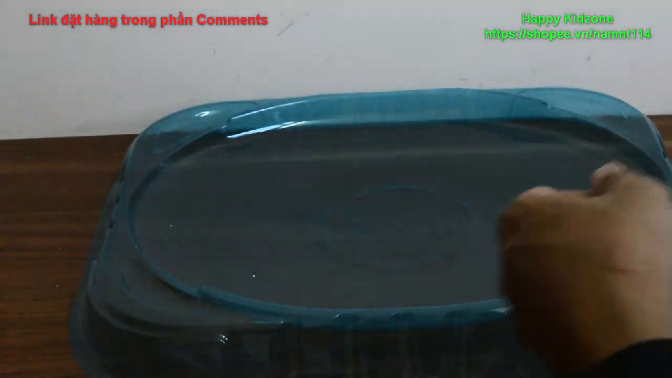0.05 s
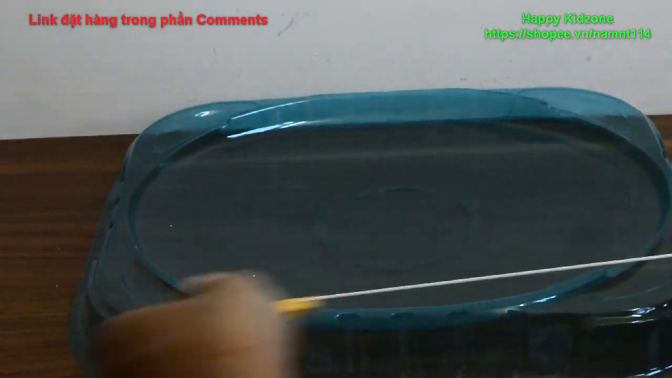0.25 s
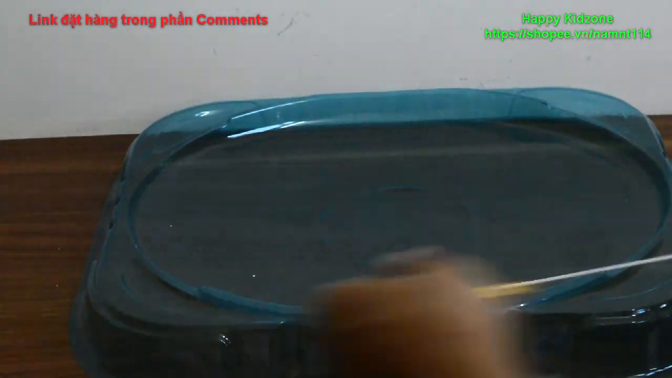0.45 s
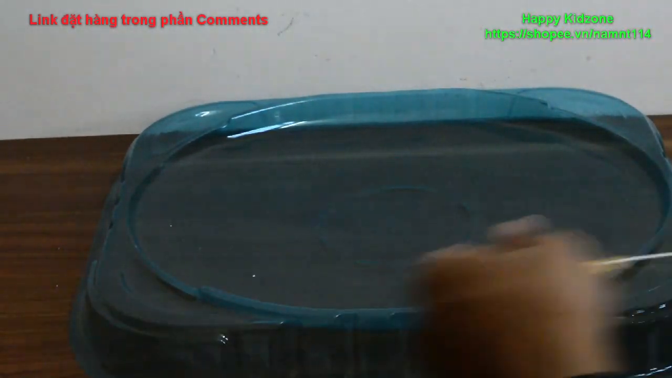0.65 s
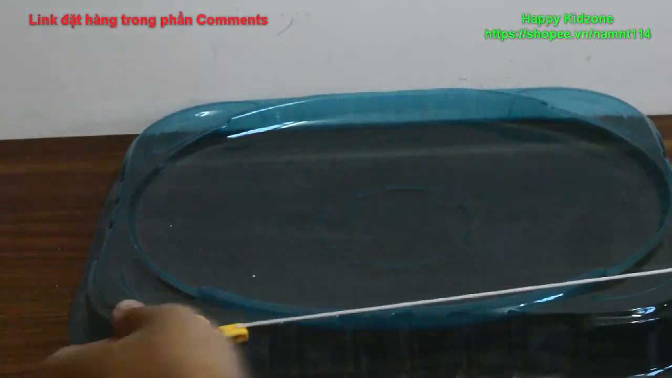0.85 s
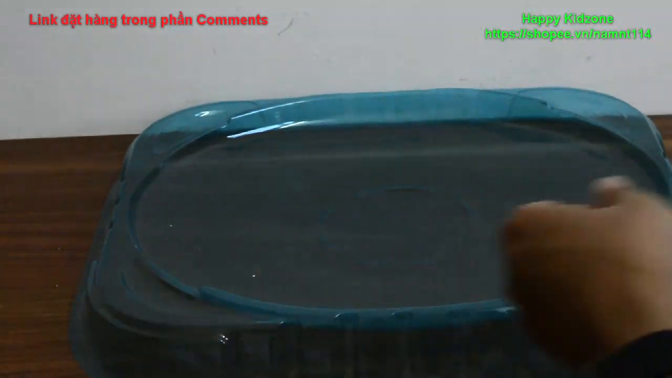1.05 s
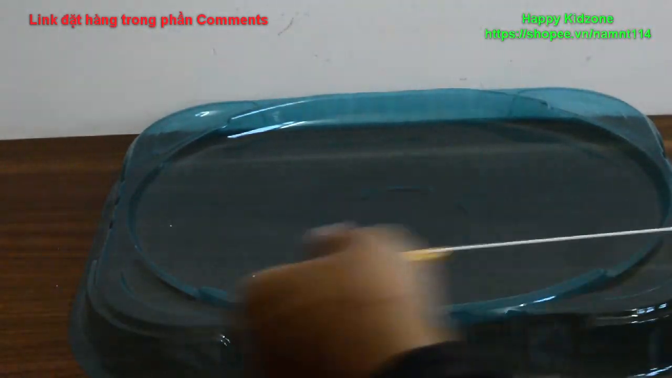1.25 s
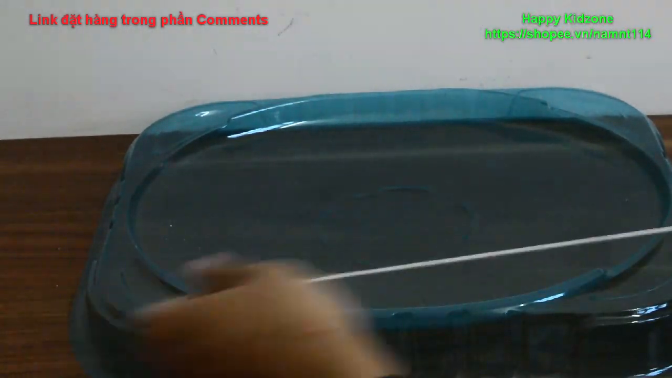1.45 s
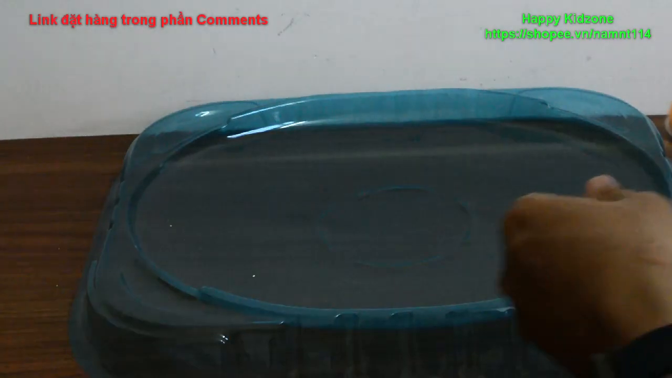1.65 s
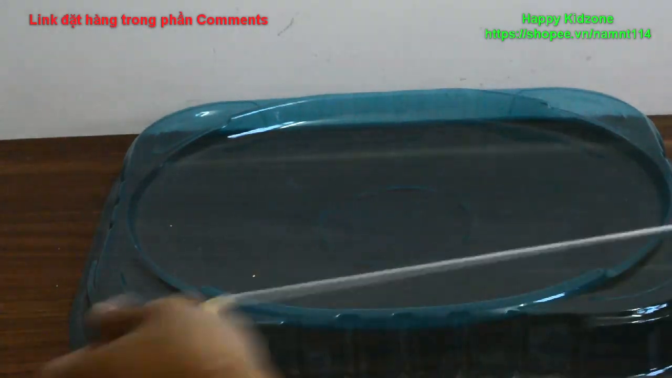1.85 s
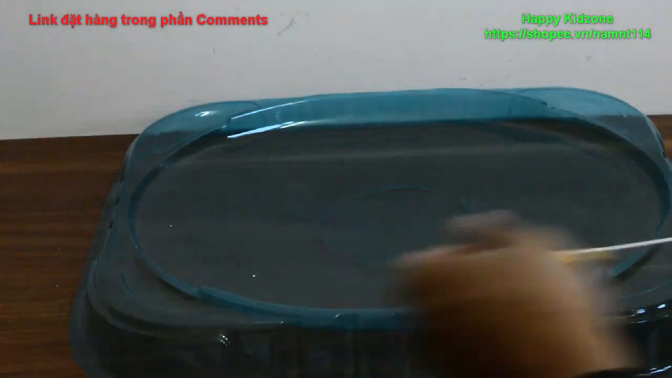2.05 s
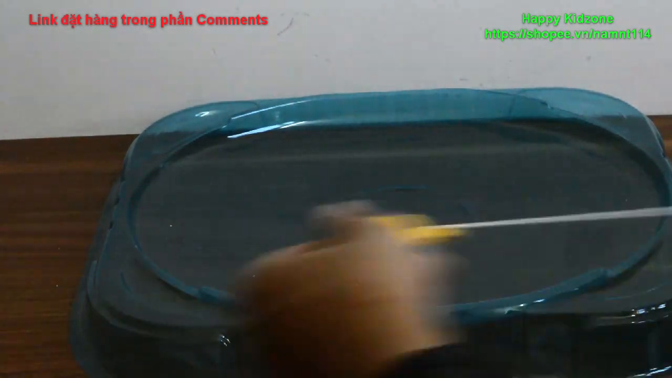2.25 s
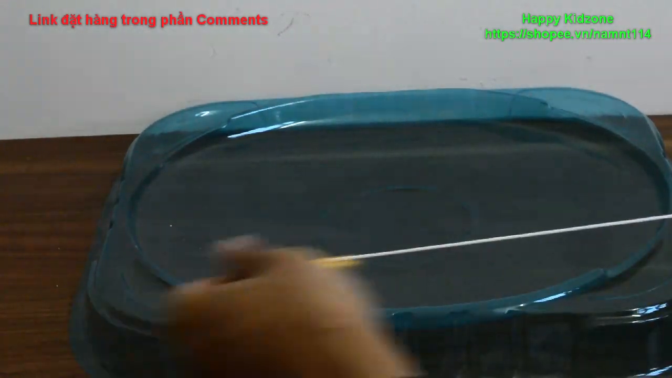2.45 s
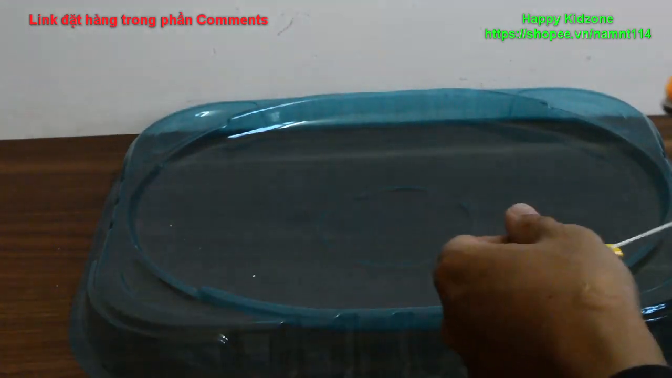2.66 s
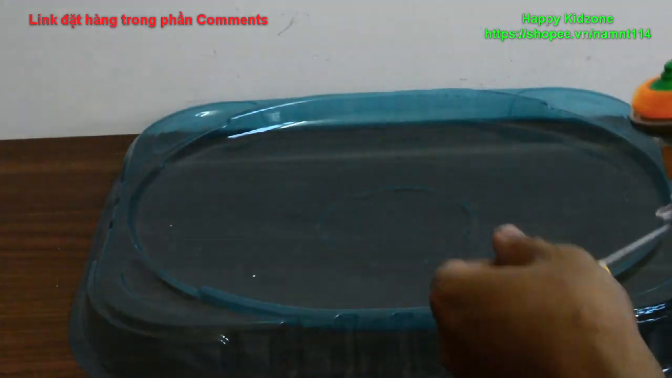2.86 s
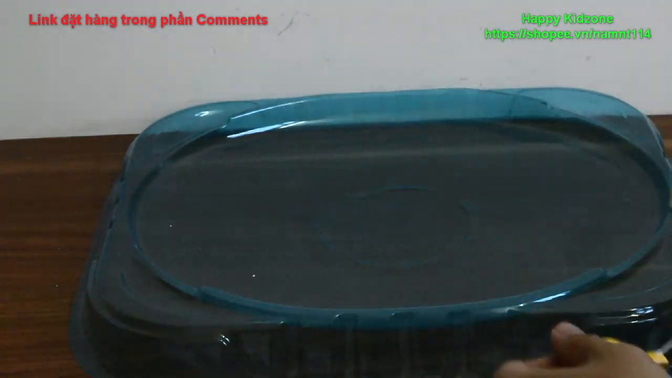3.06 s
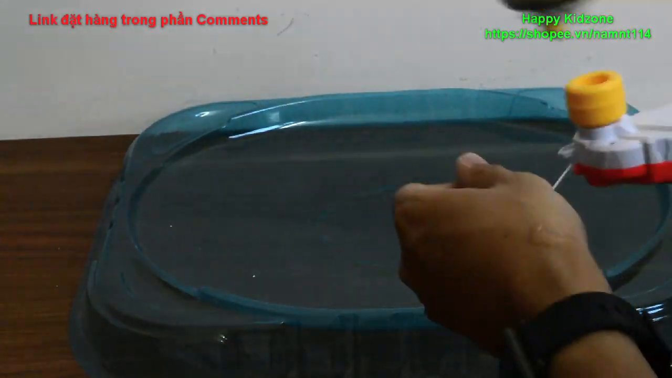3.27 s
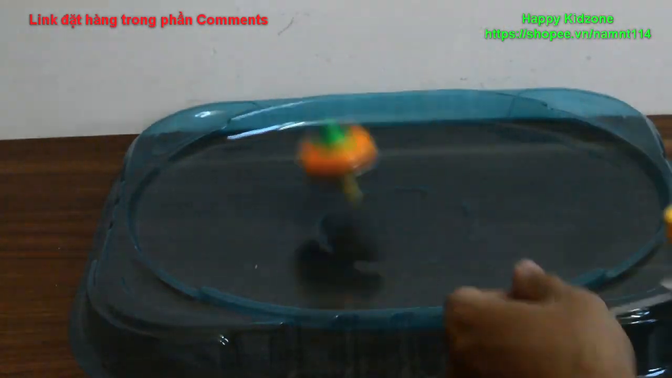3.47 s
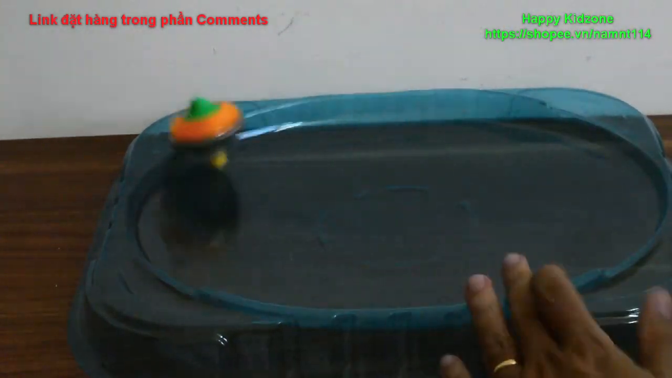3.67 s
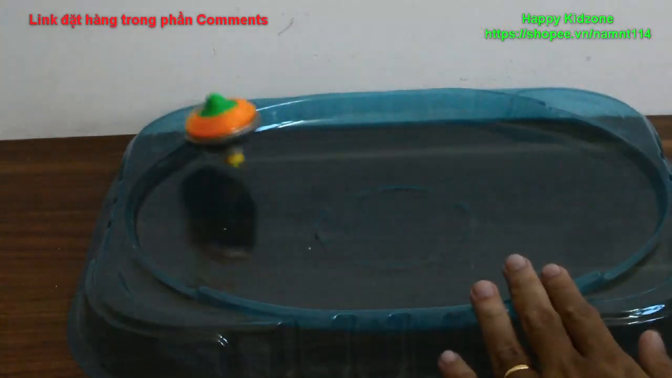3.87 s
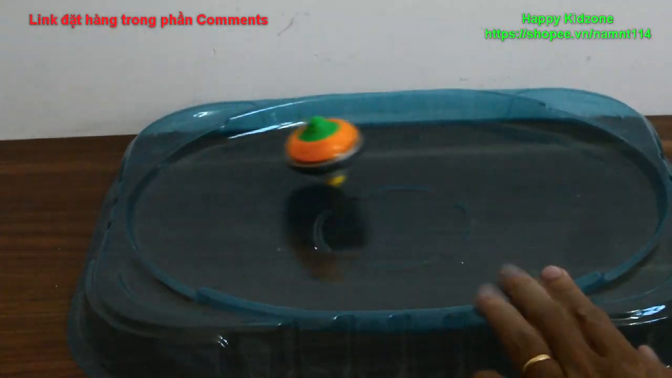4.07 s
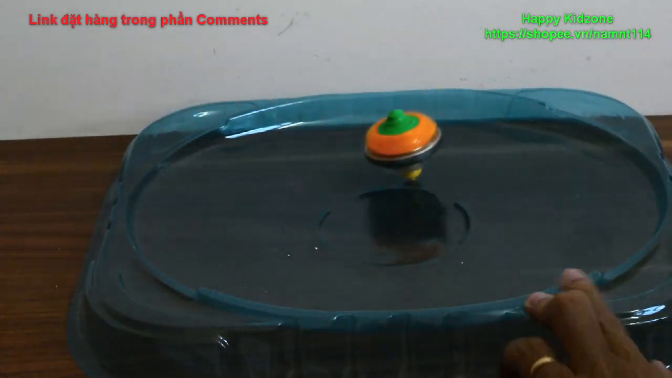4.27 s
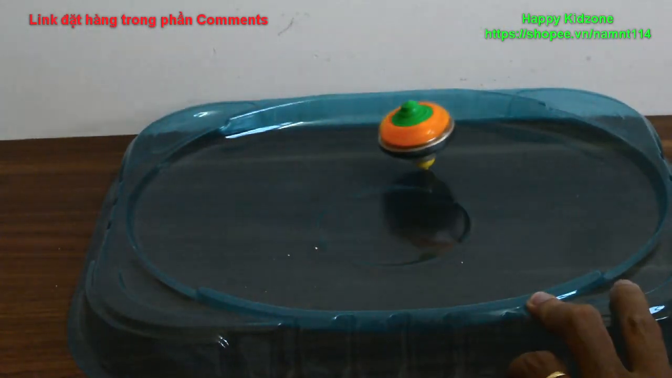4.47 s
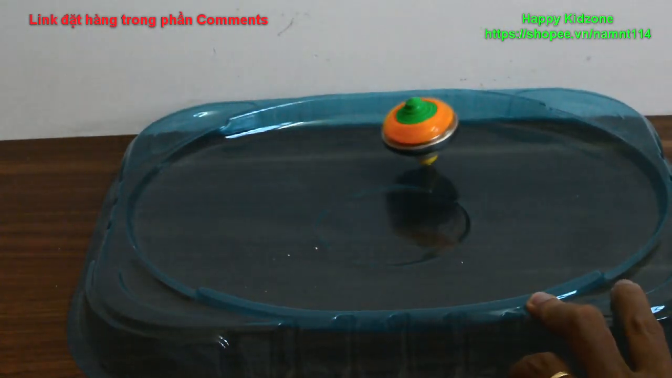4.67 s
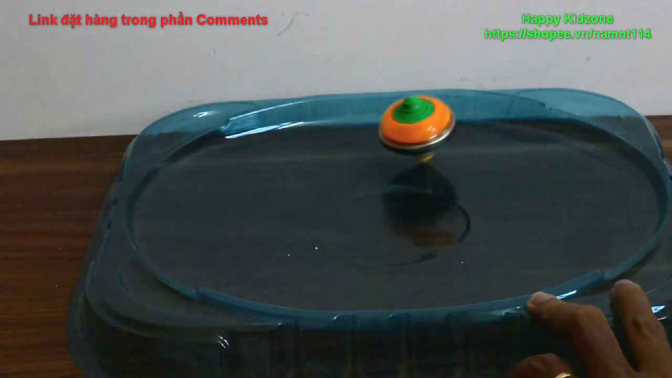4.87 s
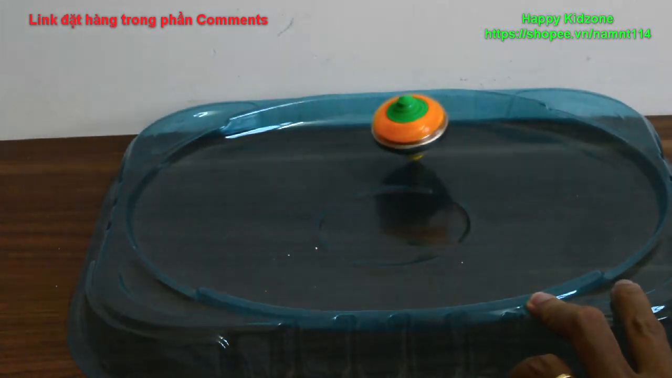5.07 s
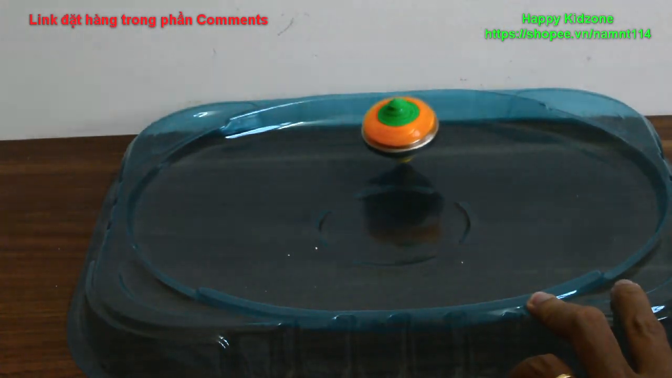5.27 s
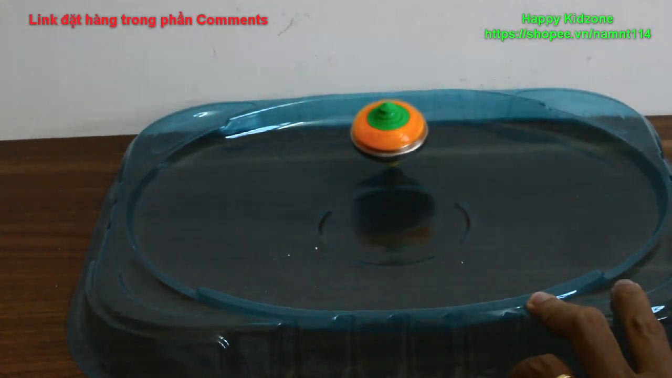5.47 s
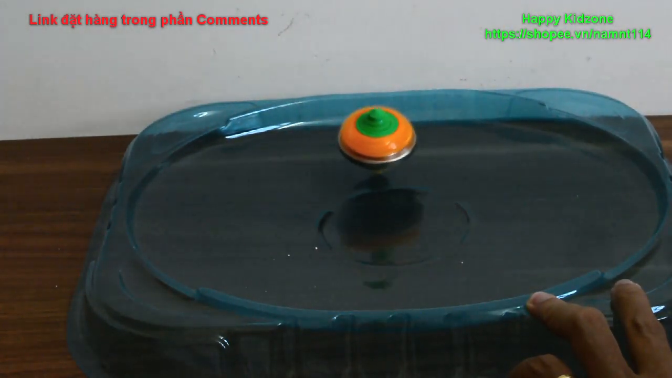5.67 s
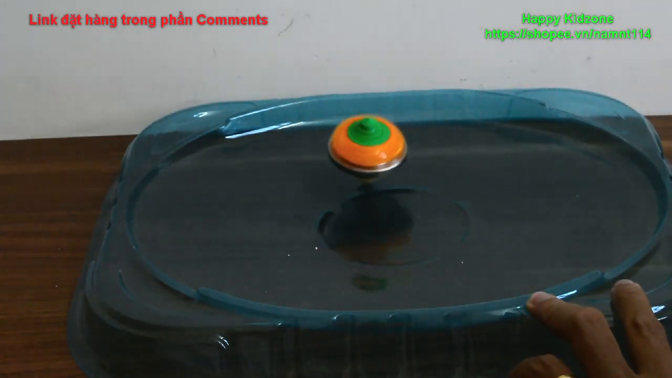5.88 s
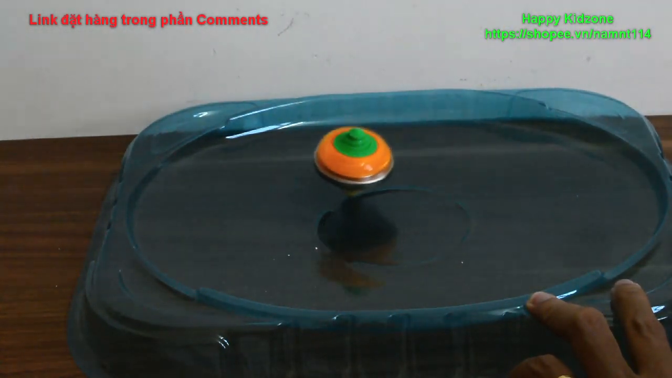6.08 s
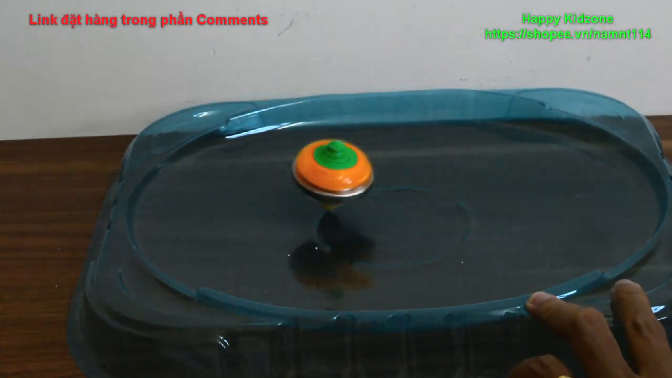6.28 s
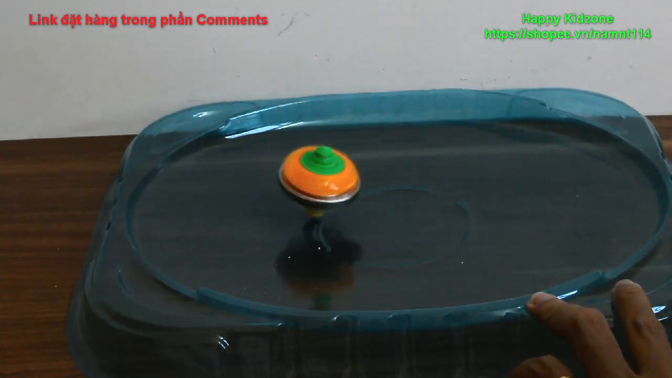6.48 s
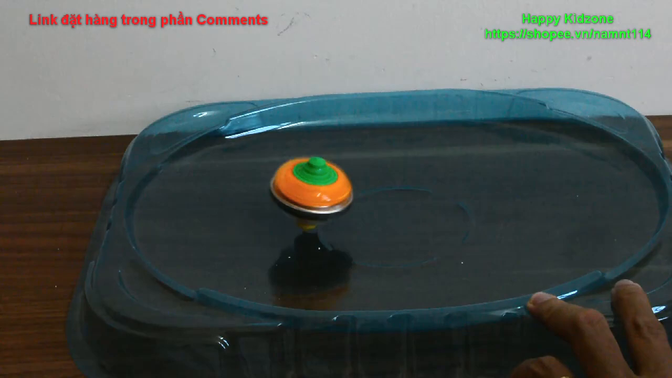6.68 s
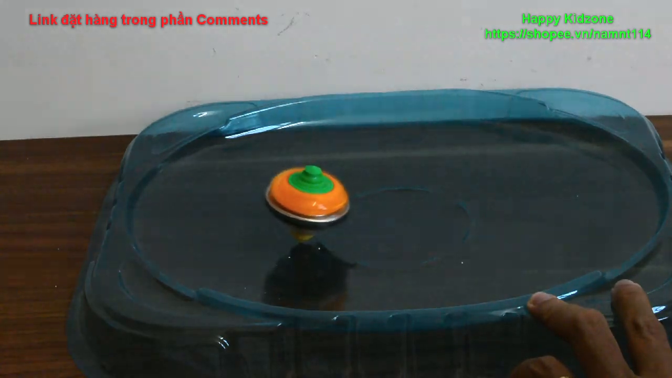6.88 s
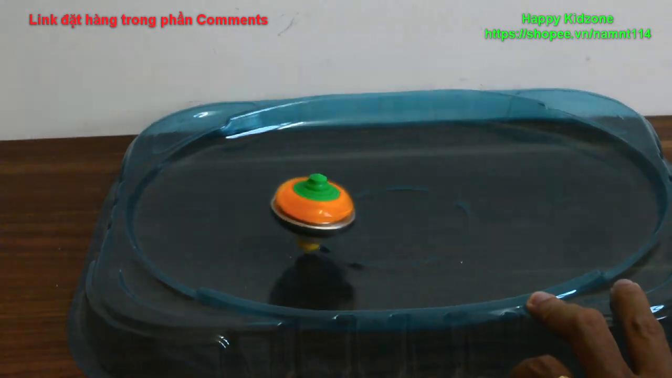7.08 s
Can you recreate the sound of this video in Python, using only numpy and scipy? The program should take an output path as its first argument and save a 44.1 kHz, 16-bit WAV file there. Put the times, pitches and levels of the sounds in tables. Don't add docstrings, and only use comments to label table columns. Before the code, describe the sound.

Dry, close stereo sound, slightly nearer the right, with dulled extreme treble. A loose, hissing toy mechanism is yanked back and forth five times, teeth whining and pawls clattering at each turnaround. After a short pause in the pulling, a top smacks a resonant plastic tray, hits again, rattles along the rim and settles. Its thin whirr fades gradually, interrupted by a small double tap on the tray, almost to room quiet.

```python
import sys
import numpy as np
from scipy import signal
from scipy.fft import rfft, irfft, next_fast_len
from scipy.io import wavfile
from scipy.ndimage import uniform_filter1d

SR = 44100
rng = np.random.default_rng(int(sys.argv[2]) if len(sys.argv) > 2 else 0)


def voltage_ratio(level):
    return 10 ** (np.asarray(level, float) / 20)


def pcm_store(signal):
    levels = np.round(np.clip(np.atleast_2d(signal), -1, 1) * 32767)
    wavfile.write(sys.argv[1], SR, levels.astype(np.int16).T)


N = 314474

# (time [s], hiss level [dB],
# looseness of the casing [dB])
WHIRR = [(0.0, -23.5, -3.5), (0.54, -26, 0), (1.41, -24, -1), (1.79, -24, -1.5), (1.93, -26.5, 1),
         (2.34, -24.5, -2.5), (2.5, -27, 0), (2.98, -23.5, -7.5), (3.37, -23.5, -5), (3.51, -27, -4.5),
         (3.57, -41, 6.5), (4.06, -44, 6), (4.16, -35, -1), (4.4, -31.5, -4.5), (4.75, -33.5, -3),
         (5.36, -39, -5), (6.39, -46.5, 5), (7.13, -57.5, 10)]
# (frequency [Hz], density [dB per Hz])
HISS_SPECTRUM = [(1500, -39), (2500, -5.5), (3100, -4.5), (4700, -0.5), (6000, 1), (7000, 3), (8600, 3),
                 (16000, -3)]
# (frequency [Hz], density [dB per Hz])
BUZZ_SPECTRUM = [(180, -48), (300, -37.5), (606, -6), (734, 0), (890, 5.5), (1530, -2), (2200, 1.5),
                 (3510, -3.5), (4900, -1), (6100, -13.5), (9900, -120)]
# (frequency [Hz], width [Hz], level [dB])
BODY_MODES = [(2450, 420, -0.5), (4450, 900, -2), (6600, 900, -5), (8200, 1100, 0)]
# (time [s], peak level [dB])
CLACKS = [(.0934, -8), (.1582, -1), (.1735, -9), (.2104, -5), (.2506, -8), (.278, -6), (.327, -5),
          (.3845, -5), (.5198, -8), (.568, -9), (.638, -7), (.6455, -3), (.655, -2), (.6635, -4),
          (.669, -2), (.680, -4), (.696, -5), (.7005, -4), (.716, -9), (1.1648, -3), (1.1685, -4),
          (1.174, -3), (1.195, -6), (1.2005, -4), (1.215, -5), (1.223, -3), (1.2765, -4), (1.4103, -5),
          (1.62, -8), (1.689, -7), (1.7235, -10), (1.7783, -7), (1.7825, -4), (1.8337, -1), (1.843, -6),
          (2.0921, -9), (2.177, 1), (2.186, -3), (2.192, -3), (2.1965, -5), (2.2, -5), (2.209, -6),
          (2.2943, -9), (2.306, -10), (2.318, -1), (2.328, -8), (2.4512, -9), (2.4615, -6), (2.470, -6),
          (2.5645, -9), (2.79, -9), (2.801, -12), (2.809, -12), (2.99, -12), (3.001, -11), (3.013, -12),
          (3.2948, -8)]
# (frequency [Hz], density [dB per Hz])
CLACK_SPECTRUM = [(290, -73), (500, -30.5), (996, -19.5), (1120, -21), (2270, -9.5), (3910, -12.5),
                  (4360, -13), (4920, -8), (9000, -11), (11700, -25), (19800, -120)]
# (start [s], hold [s], chatter [dB], squeal [dB], fall [dB per s])
SLIPS = [(0.09, 0.0028, -22.5, -33, 350), (0.160, .005, -20, -24, 454), (0.25, 0.09, -24, -31, 600),
         (0.497, 0.028, -25, -43, 143), (0.643, 0.056, -17.5, -22.5, 550), (1.161, 0.053, -16, -23, 700),
         (1.272, .01, -17.5, -26, 296), (1.684, 0.059, -20.5, -32, 900), (1.779, 0.0093, -17, -22, 1200),
         (1.836, .015, -22, -23, 300), (1.887, 0.019, -24.5, -29, 117), (2.176, 0.014, -15.5, -19, 210),
         (2.320, 0.0034, -16.5, -26, 450), (2.373, 0.023, -30, -32, 350), (2.448, .025, -17.5, -35, 500),
         (2.758, 0.038, -23.5, -35, 250), (3.294, .003, -19.5, -38, 340)]
# (start [s], length [s], first tooth rate [Hz], last tooth rate [Hz], level [dB])
PULLS = [
    (.21, .225, 655, 766, -26),
    (0.745, .21, 750, 848, -27),
    (1.31, 0.17, 795, 858, -27),
    (1.835, 0.155, 835, 850, -27),
    (2.32, 0.14, 850, 880, -28),
]
# (levels of the tooth rate and its multiples 2, 3, 4, 5 [dB])
TEETH = [(-7, -5, -7, -5, -5), (-13, -9, -1, -10, -7), (-21, -9, -2, -12, -12), (-19, -5, -6, -11, -7),
         (-12, -6, -8, -10, -8)]
# (start [s], hold [s], level [dB])
REWINDS = [(.505, .04, -33), (1.0, .06, -39), (1.53, .12, -33), (2.04, .1, -36), (2.55, .08, -37),
           (2.88, .05, -42)]
# (time [s], bowl [dB], rim [dB], lip [dB], fall [dB per s])
JOLTS = [
    (3.292, -38, -33, -40, 450),
    (3.556, -14, -20, -23, 200),
    (3.76, -21, -13.5, -26, 305),
    (3.897, -19, -13, -21, 802),
    (3.909, -25, -22, -28, 110),
    (6.158, -38, -39, -43, 160),
    (6.389, -30, -28, -26, 300),
]
# (start [s], hold [s], bowl [dB], rim [dB], deep flex [dB])
ROLLS = [
    (3.618, 0.021, -34.5, -33, -66),
    (3.793, 0.041, -34, -28.5, -59),
    (4.10, 0.07, -33.5, -39, -41),
    (6.365, .02, -42, -35, -41.5),
]
# (time [s], crack [dB], bowl boom [dB], rim boom [dB], skid [s])
BLOWS = [(3.5559, -2, -12, -11, .002), (3.5715, -26, -17, -22, .002), (3.585, -28, -17, -28, .002),
         (3.595, -32, -23, -28, .002), (3.606, -34, -24, -30, .002), (3.664, -28, -28, -25, .002),
         (3.7200, -9, -48, -48, .004), (3.724, -16, -46, -46, .045), (3.7612, -0.5, -18, -16, .00069),
         (3.7745, -22, -22, -26, .002), (3.9001, -11.5, -16, -20, .0035), (3.9065, -6.5, -26, -27, .001),
         (6.160, -39, -50, -47, .013), (6.379, -26, -32, -29, .012), (6.396, -28, -25, -26, .01),
         (6.408, -30, -26, -28, .012), (6.44, -38, -40, -34, .015)]
# (frequency [Hz], density [dB per Hz])
CRACK_SPECTRUM = [(500, -29), (1200, -11), (2500, -3.5), (3600, -2), (4300, 2.5), (6000, -0.5),
                  (8500, -4.5), (10000, 3), (16000, -11)]
# (frequency [Hz], level [dB], T60 [s])
DISH_MODES = [(327, -2, 0.058), (352, -24, 0.076), (478, -8.5, 0.17), (545, 1.5, 0.14), (590, 0, 0.14),
              (654, 4, 0.11), (691.4, 2, 0.15), (746, 2.5, 0.16), (834, -6.5, 0.28), (908, -9, 0.2),
              (933, 2, 0.16), (985, 6, 0.049), (1170, -4, 0.11), (1254, 1, 0.12), (1310, 1.5, 0.08),
              (1400, -2, 0.14), (1496, -1, 0.07), (1597, -4, 0.095), (1703, -8, 0.096), (1860, -8, 0.073),
              (2150, -8.5, 0.055), (2270, -17.5, 0.098), (2520, -8, 0.067), (2594, -10, 0.095),
              (2820, -7, 0.021)]
# (frequency [Hz], level [dB], T60 [s])
TABLE_MODES = [(70, -5, 0.054), (129, -5, 0.054), (242, 4, 0.049)]
# (rise [s], hold [s], level [dB], fall [dB per s])
WOBBLE = (0.0042, 0.54, -36, 61)
# (from [s], to [s])
RIM_SINGS = (3.74, 4.06)
# (start [s], end [s], first frequency [Hz], last frequency [Hz], level [dB])
DRONES = [(3.72, 3.87, 3700, 3700, -44), (5.05, 5.55, 1200, 1330, -59), (6.3, 7.13, 670, 670, -62.5),
          (6.8, 7.13, 243, 243, -59.5), (6.2, 7.1, 85, 80, -60)]
# (frequency [Hz], density [dB per Hz])
HUM_SPECTRUM = [(20, -21), (50, -8.5), (120, -23.5), (200, -9), (350, -13.5), (500, -17), (800, -14),
                (1500, -15.5), (2600, -45), (5000, -51)]
# (T60 [s], level [dB])
ROOM = [(0.35, -5), (0.036, -6)]
# (frequency [Hz], gain [dB])
OVERALL_COLOUR = [(60, -14), (200, -6.5), (500, 3), (9000, 3), (9600, -3.5), (10100, -47), (10500, -11.5),
                  (11000, -19.5), (11500, -47), (12400, -22), (13100, -33), (13600, -15), (14700, -18.5),
                  (16000, -46)]

TIME = np.arange(N) / SR
FFT = next_fast_len(N + SR // 4)
HZ = np.maximum(np.arange(FFT // 2 + 1) * SR / FFT, 1)
RELEASE_S = 3.553
HELD = np.arange(N) < RELEASE_S * SR
NUDGE_S = 6.0
WIDE_HZ = 3170
TREBLE_HZ = 9600


def rms_one(x):
    return x / np.sqrt(np.mean(x ** 2) + 1e-20)


def butter(x, order, hz, kind="low"):
    return signal.sosfilt(signal.butter(order, hz, kind, fs=SR, output="sos"), x)


def in_time(rows):
    s, *columns = np.transpose(rows)
    return [np.interp(TIME, s, c) for c in columns]


def phase(hz):
    return 2 * np.pi * np.cumsum(hz) / SR


def drift(rate):
    knots_per_s = 400
    knots = rng.standard_normal(int(N / SR * knots_per_s) + 400)
    r = np.exp(-2 * np.pi * rate / knots_per_s)
    slow = rms_one(signal.lfilter([1], [1, -2 * r, r * r], knots)[300:])
    return np.interp(TIME * knots_per_s, np.arange(len(slow)), slow)


def colour(x, spectrum, size=8192):
    hz, db = np.transpose(spectrum)
    grid = np.maximum(np.arange(size // 2 + 1) * SR / size, 1)
    cepstrum = irfft(np.log(voltage_ratio(np.interp(np.log(grid), np.log(hz), db))))
    cepstrum[1:size // 2] *= 2
    cepstrum[size // 2 + 1:] = 0
    response = irfft(np.exp(rfft(cepstrum)))
    return irfft(rfft(x, FFT) * rfft(response, FFT), FFT)[..., :N]


def ring(x, hz, t60):
    r, w = voltage_ratio(-60 / (t60 * SR)), 2 * np.pi * hz / SR
    return signal.lfilter([0, np.sin(w)], [1, -2 * r * np.cos(w), r * r], x + 1e-18)


def narrow_ring(x, hz, t60):
    return rms_one(ring(ring(x, hz, t60), hz, t60))


def grains(per_s, spread_db, size=N):
    heights = voltage_ratio(spread_db * np.minimum(rng.exponential(1, size), 4))
    signs = np.sign(rng.random(size) - .5)
    return rms_one(heights * signs * (rng.random(size) < per_s / SR))


def patchy(x, depth_db):
    spectrum, octave, out = rfft(x, FFT), np.clip(np.log2(HZ / 700), 0, 4), 0
    for k in range(5):
        mask = np.cos(np.pi / 2 * np.clip(octave - k, -1, 1)) ** 2
        out = out + irfft(spectrum * mask, FFT)[..., :N] * voltage_ratio(depth_db * drift(11.3))
    return rms_one(out)


def bursts(times, gains, lengths):
    out, t = np.zeros(np.shape(gains)[:-1] + (N,)), np.arange(4000) / SR
    for k, puff in enumerate(rng.standard_normal((len(times), len(t)))):
        i = round(times[k] * SR)
        out[..., i:i + len(t)] += gains[..., k, None] * puff * np.exp(-t / lengths[k])
    return out


def impulses(times, gains):
    out = np.zeros(np.shape(gains)[:-1] + (N,))
    out[..., (times * SR).astype(int)] = gains
    return out


def swell(start, rise, hold, fall_db_per_s):
    t = TIME - start
    return np.clip(t / rise, 0, 1) * voltage_ratio(-fall_db_per_s * np.clip(t - rise - hold, 0, 1))


def whirr():
    hiss_db, loose_db = in_time(WHIRR)
    buzz_db = hiss_db + loose_db
    flutter_db = 0.46 * drift(82) + np.where(HELD, 1.1, 0.4) * drift(8.1)
    rub = grains(9000, spread_db=2.5, size=(2, N)) * voltage_ratio(flutter_db)

    thin = butter(rub, 4, 1880, "high")
    rings = [voltage_ratio(db) * rms_one(ring(thin, hz, 2.2 / width)) for hz, width, db in BODY_MODES]
    hiss = rms_one(colour(rub, HISS_SPECTRUM)) + voltage_ratio(np.where(HELD, -16, -7)) * sum(rings[1:])

    buzz = rms_one(colour(np.roll(rub, SR, axis=1), BUZZ_SPECTRUM))
    grip_hz = 1183
    dull = rms_one(butter(buzz, 2, grip_hz))
    lowest_ring_db = np.where(HELD, -10.0, -10.5) + 1.4 * drift(3.9)
    bright = butter(buzz, 2, grip_hz, "high") + voltage_ratio(lowest_ring_db) * rings[0]
    hum = rms_one(butter(rub, 2, [1000, 1800], "band"))

    rise, hold, wobble_db, fall = WOBBLE
    dull_gain = voltage_ratio(buzz_db + np.where(HELD, -12, -10.5)) + voltage_ratio(wobble_db) * swell(RELEASE_S, rise, hold, fall)
    pull_load_db = 2.5 * pulls()[1].sum(axis=0)
    mix = voltage_ratio(hiss_db + 0.2) * hiss
    mix = mix + voltage_ratio(buzz_db - 4.0 + pull_load_db) * bright
    mix = mix + voltage_ratio(hiss_db - 23) * ~HELD * hum
    mix = mix + voltage_ratio(-3.0) * dull_gain * dull
    return patchy(mix, depth_db=np.where(HELD, 1.3, .6)) * np.std(mix)


def room_hum():
    mid, side = colour(rng.standard_normal((2, N)), HUM_SPECTRUM)
    rise, hold, db, fall = WOBBLE
    gain = voltage_ratio(-64) + voltage_ratio(db - 30) * swell(RELEASE_S, rise, hold, fall)
    return voltage_ratio(11.0) * gain * rms_one(mid + 0.27 * side * np.array([[1], [-1]]))


def room(x):
    move = 4096
    t, count = np.arange(SR // 3) / SR, N // move + 2
    noise = rng.standard_normal((3, count, len(t))) * (t > .001)
    same, left, right = (voltage_ratio(db) * rms_one(v * voltage_ratio(-60 * t / t60)) / np.sqrt(len(t))
                         for v, (t60, db) in zip(noise, ROOM + ROOM[1:]))
    echoes = butter(same, 1, WIDE_HZ) + butter(np.array([left, right]), 1, WIDE_HZ, "high")
    padded, span = np.pad(x, (move, 2 * move)), np.arange(2 * move)
    pieces = padded[move * np.arange(count)[:, None] + span] * np.sin(np.pi * span / (2 * move))
    wet = signal.fftconvolve(pieces[None], echoes, axes=2)
    out = np.zeros((2, len(padded) + SR))
    for k in range(count):
        out[:, k * move:k * move + wet.shape[2]] += wet[:, k]
    return out[:, move:move + N]


def clutch():
    s, db = np.transpose(CLACKS)
    clacks = colour(bursts(s, voltage_ratio(db) * [[1], [.5]], [.002] * len(s)), CLACK_SPECTRUM)

    catches = signal.lfilter([1], [1, -.985], np.abs(grains(900, spread_db=-8.0))) ** 0.4
    chatter = rms_one(colour(catches * rng.standard_normal((2, N)), CLACK_SPECTRUM))

    rise = 0.0055
    chatter_gain, squeal_gain = sum(
        voltage_ratio([[chatter_db], [squeal_db]]) * swell(start - rise / 2, rise, hold, fall)
        for start, hold, chatter_db, squeal_db, fall in SLIPS)
    hz = 4375 * (1 + 0.013 * drift(8.0))
    squeal = np.sin(phase(hz * (1 + 0.0159 * drift(86)))) * drift(125)
    return voltage_ratio(5.5) * clacks + voltage_ratio(-8.0) * chatter_gain * chatter + voltage_ratio(1.2) * squeal_gain * squeal * [[1], [0]]


def pulls():
    edge_s = .05
    done = np.array([np.clip((TIME - start) / length, 0, 1) for start, length, *_ in PULLS])
    lengths = np.array(PULLS)[:, 1:2]
    return done, np.clip(np.minimum(.6 * done, 1 - done) * lengths / edge_s, 0, 1)


def gears():
    climb, sag = 1.35, .04
    done, swells = pulls()
    hz = np.zeros(N)
    for (_, _, from_hz, to_hz, _), gone in zip(PULLS, done):
        slack = np.clip((climb * gone - 1) / (climb - 1), 0, 1)
        rate = from_hz + (to_hz - from_hz) * np.minimum(climb * gone, 1) ** 0.8 - sag * to_hz * slack
        hz[gone > 0] = rate[gone > 0]
    turn = phase(hz * (1 + 0.012 * drift(70)))
    levels = voltage_ratio(np.array(TEETH) + np.array(PULLS)[:, 4:]).T @ swells
    levels[0] *= np.clip(2.3 * (done * (swells > 0)).sum(axis=0), 0, 1) ** 1.5
    return sum(level * (1.05 + 0.35 * drift(60)) * np.sin((k + 1) * turn) for k, level in enumerate(levels))


def spool():
    gain = sum(voltage_ratio(db) * swell(start, .02, hold, 300) for start, hold, db in REWINDS)
    return gain * voltage_ratio(1.5 * drift(30) - 2.5) * narrow_ring(grains(3000, spread_db=3.0), 2230, .006)


def dish_rattle():
    jolts = sum(voltage_ratio([[bowl], [rim], [lip], [bowl - 23]]) * swell(at, 0.0053, 0, fall)
                for at, bowl, rim, lip, fall in JOLTS)
    rolls = sum(voltage_ratio([[bowl], [rim], [rim - 1.5], [deep]]) * swell(at, 0.031, hold, 250)
                for at, hold, bowl, rim, deep in ROLLS)
    *parts, flex = jolts + rolls
    rub = grains(1500, spread_db=0.5)
    rings = [voltage_ratio(db) * ring(rub, hz, 0.3 * t60) * (-1) ** k for k, (hz, db, t60) in enumerate(DISH_MODES)]
    part = np.digitize(np.array(DISH_MODES)[:, 0], [870, 1600])
    rumble = sum(level * rms_one(np.dot(part == k, rings)) for k, level in enumerate(parts))
    deep = narrow_ring(rub, 349.6, 0.11)
    note = narrow_ring(rub, 938, .09)
    singing = (TIME > RIM_SINGS[0]) & (TIME < RIM_SINGS[1])
    return voltage_ratio(-11) * parts[1] * singing * note + voltage_ratio(-6.0) * rumble + voltage_ratio(-2.5) * flex * deep


def dish_crack():
    s, crack_db, _, _, skid = np.transpose(BLOWS)
    contact = bursts(s, voltage_ratio(crack_db), skid)
    contact[(s * SR).astype(int)] += 2.4 * voltage_ratio(crack_db)
    crack = colour(contact, CRACK_SPECTRUM)
    hard = (TIME < 3.85) | (TIME > NUDGE_S)
    return voltage_ratio(3.5) * np.where(hard, crack, butter(crack, 2, 5000))


def dish_boom():
    s, _, boom_db, rim_db, _ = np.transpose(BLOWS)
    push = impulses(s, voltage_ratio(np.array([boom_db, rim_db]) - [[18.0], [15.5]]))
    return voltage_ratio(5.5) * sum(voltage_ratio(db) * ring(push[int(hz > 870)], hz, t60) * (-1) ** k
                          for k, (hz, db, t60) in enumerate(DISH_MODES))


def table_thud():
    s, _, boom_db, _, _ = np.transpose(BLOWS)
    knock = impulses(s, voltage_ratio(boom_db - 7 * (s > NUDGE_S)))
    return sum(voltage_ratio(db - 11.5) * ring(knock, hz, t60) for hz, db, t60 in TABLE_MODES)


def drones():
    out = 0
    for start, end, from_hz, to_hz, db in DRONES:
        hz, gain = in_time([(start, from_hz, 0), (start + 0.13, from_hz, 1),
                            (end - .05, to_hz, 1), (end + 0.05, to_hz, 0)])
        out = out + voltage_ratio(db + 3.1 * drift(9.3)) * gain * np.sin(phase(hz * (1 + 0.0065 * drift(18))))
    return out


def scene():
    direct, scattered = whirr() + clutch()
    launcher = direct + spool()
    blows = gears() + dish_rattle() + dish_crack() + dish_boom() + table_thud()
    toy = launcher + blows
    wide = voltage_ratio(-4) * butter(scattered, 1, WIDE_HZ, "high")
    port_lag = 2
    heard = np.array([np.roll(toy + wide, port_lag), toy - wide]) + room(launcher + voltage_ratio(-4) * blows)
    shade = .22
    heard[0] = (1 - shade) * heard[0] + shade * butter(heard[0], 1, 2200)
    return voltage_ratio(-1.0) * heard * voltage_ratio([[-.1], [.55]]) + room_hum() + drones()


def sparse_treble(x):
    hz, _, z = signal.stft(x, SR, nperseg=2048)
    loud_db = 10 * np.log10(np.sum(np.abs(z) ** 2, axis=1, keepdims=True) + 1e-12)
    keep = (hz[:, None] < TREBLE_HZ) | (np.abs(z) > voltage_ratio(-72 + .6 * (loud_db + 24)))
    return signal.istft(z * keep, SR, nperseg=2048)[1][:, :N]


def band_limit(x):
    return signal.sosfilt(signal.butter(12, 16510, fs=SR, output="sos"), x)


def record(dry):
    top = butter(dry, 4, [TREBLE_HZ, 15800], "band")
    sharp = (uniform_filter1d(np.abs(top).mean(axis=0), size=300) / voltage_ratio(-24)) ** 4
    x = colour(dry, OVERALL_COLOUR) + voltage_ratio(-13) * top * sharp / (1 + sharp)
    over_db = np.maximum(20 * np.log10(np.abs(x).max(axis=0) + 1e-9) + 10.3, 0)
    recovery_db = 90 * TIME
    held_db = np.maximum.accumulate(over_db + recovery_db) - recovery_db
    offset = .0022 * voltage_ratio(-1.5 * signal.lfilter([.02], [1, -.98], held_db))
    mix = sparse_treble(.97 * np.tanh(x / .8) + offset)
    return band_limit(mix)


dry = scene()
out = record(dry)
pcm_store(out)
```